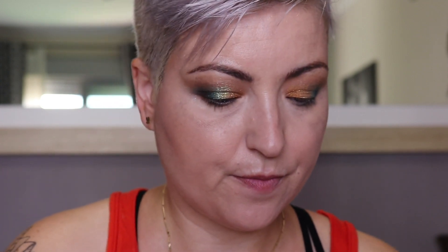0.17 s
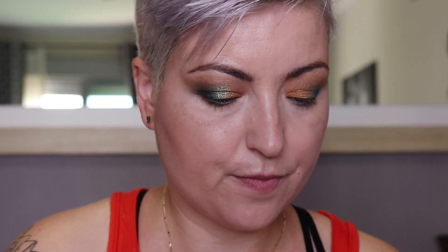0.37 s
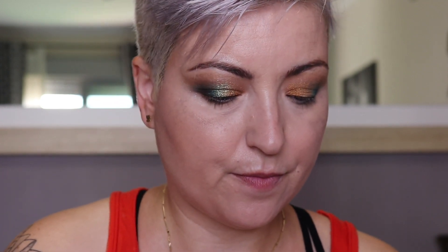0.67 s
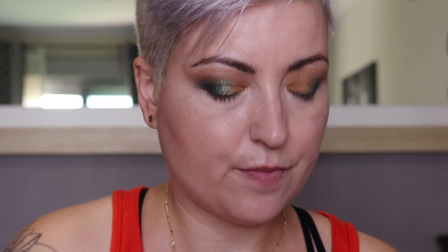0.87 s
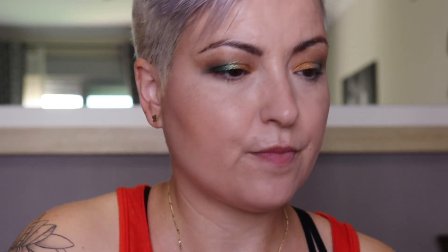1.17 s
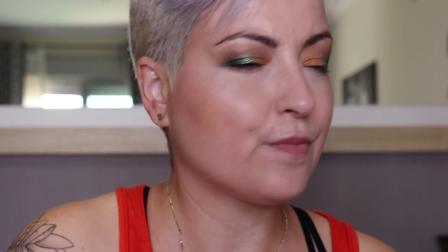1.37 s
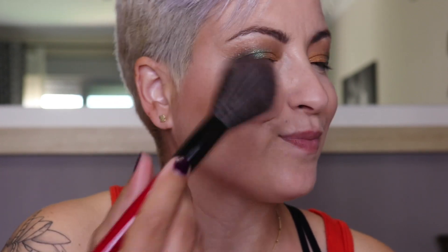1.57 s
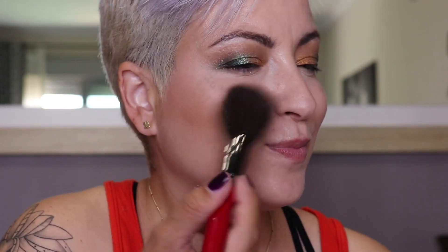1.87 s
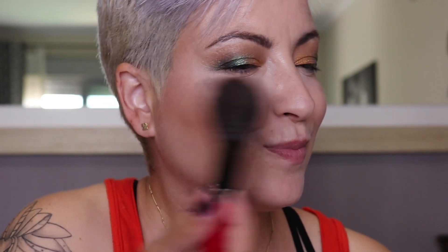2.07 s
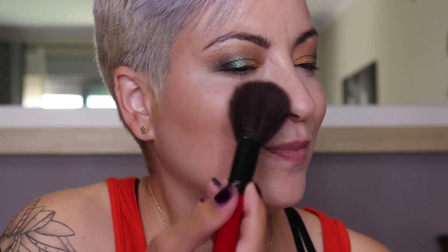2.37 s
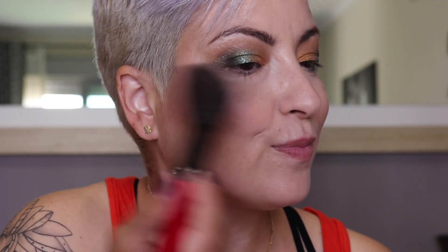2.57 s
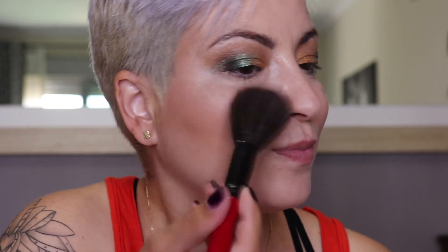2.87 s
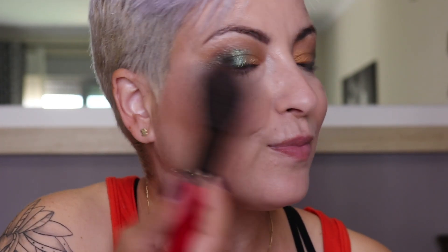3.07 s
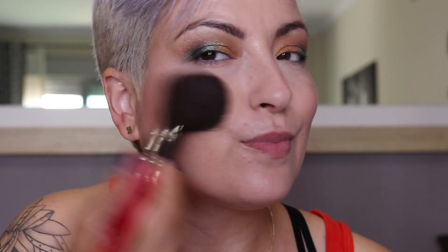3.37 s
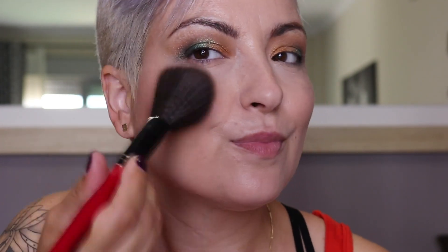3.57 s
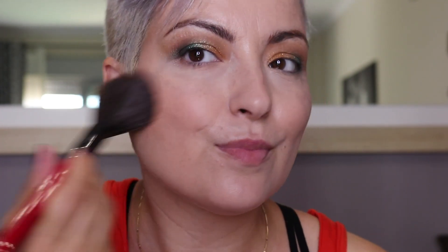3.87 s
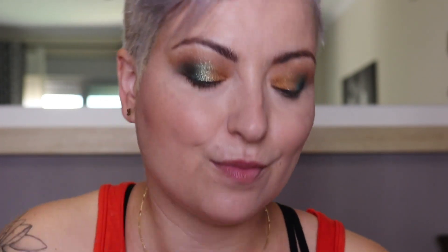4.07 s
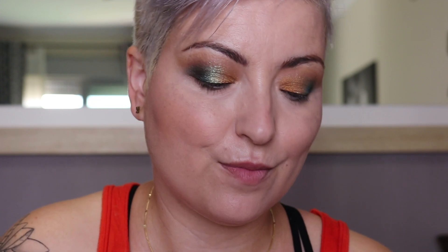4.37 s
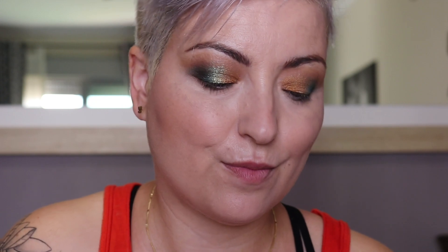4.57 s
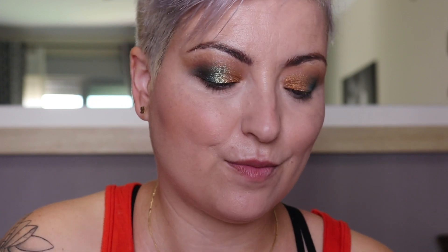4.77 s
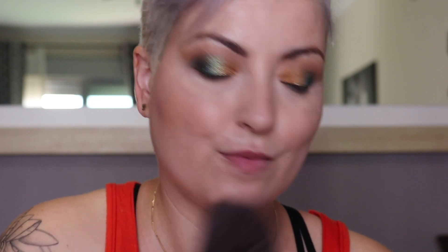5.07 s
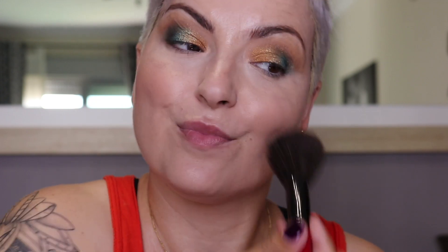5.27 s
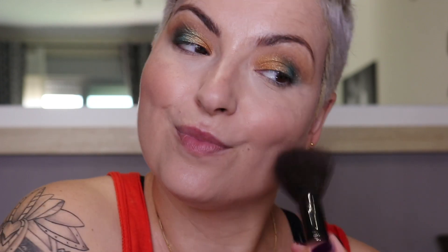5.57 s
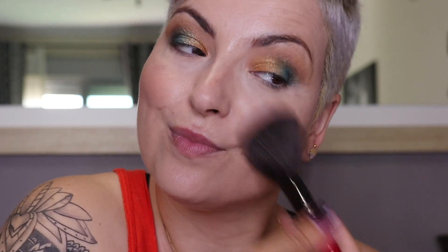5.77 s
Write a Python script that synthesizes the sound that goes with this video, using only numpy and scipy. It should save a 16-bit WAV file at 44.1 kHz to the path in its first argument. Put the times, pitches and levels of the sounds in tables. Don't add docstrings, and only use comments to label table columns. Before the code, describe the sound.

Two loud sharp taps break a hushed room where a makeup brush whispers in short airy strokes, with distant birds and low engine hum.

```python
import sys
import numpy as np
from scipy import signal
from scipy.fft import rfft, irfft, next_fast_len
from scipy.io import wavfile
from scipy.ndimage import uniform_filter1d, map_coordinates

SR = 44100
rng = np.random.default_rng(int(sys.argv[2]) if len(sys.argv) > 2 else 0)


def store_pcm(level_fs):
    pcm = np.round(np.clip(level_fs, -1, 1) * 32767).astype(np.int16)
    wavfile.write(sys.argv[1], SR, np.atleast_2d(pcm).T)


def amplitude_ratio(level_db):
    exponent = np.asarray(level_db, float) / 20
    return 10 ** exponent


N = 260631

# [f/Hz, density/dB per Hz]
AIR_COLOUR = [(12, -25), (20, -21), (49, -4.5), (95, -9.5), (208, -8), (260, -7.5), (374, -14), (537, -8.5),
              (635, -11), (1510, -18), (1940, -22), (5290, -24), (6800, -27.5), (11900, -29.5),
              (15700, -29.5)]
# [t/s, turning rate of one cycle/Hz, load/dB]
ENGINE_IDLE = [(0, 24.93, -47), (.35, 26.34, -48.5), (1.0, 26.45, -50), (1.6, 26.04, -51),
               (2.2, 26.16, -57.5), (3.1, 26.52, -63), (3.6, 26.14, -52), (4.7, 25.53, -55.5),
               (5.1, 25.87, -47), (5.45, 24.2, -54), (5.62, 24.17, -45), (5.91, 24.06, -73)]
# [t/s, strength/dB, thud/dB, brightness/dB per octave]
HANDLE_TAPS = [
    (1.161, 4.46, -15.5, 2.9),
    (1.3807, 5.5, -37, 4.5),
]


def unit(x):
    return x / np.sqrt(np.mean(x ** 2) + 1e-20)


def along(points, hz):
    f, v = np.transpose(points)
    return np.interp(np.log(hz + 1), np.log(f + 1), v)


def curves(rows):
    s, *cols = np.transpose(rows)
    return [np.interp(np.arange(N) / SR, s, c) for c in cols]


def wobble(rate):
    s = np.arange(0, N + 32, 32) / SR
    knots = rng.standard_normal(int(N * rate / SR) + 4)
    return np.interp(np.arange(N) / SR, s, map_coordinates(knots, [s * rate]))


def filtered(x, response):
    m = next_fast_len(len(x) + 8192)
    return irfft(rfft(x, m) * response(np.fft.rfftfreq(m, 1 / SR)), m)[:len(x)]


def rush(spectrum, patchy_db):
    z = signal.stft(rng.standard_normal(N), nperseg=512)[2]
    field = uniform_filter1d(rng.standard_normal(z.shape), size=5, axis=0)
    field = uniform_filter1d(field, size=12, axis=1)
    x = signal.istft(z * amplitude_ratio(patchy_db * unit(field)), nperseg=512)[1][:N]
    return unit(filtered(x, lambda hz: amplitude_ratio(along(spectrum, hz))))


def tail(decays):
    hz, t, z = signal.stft(rng.standard_normal(SR // 2), SR, nperseg=128)
    fading = z * amplitude_ratio(-60 * t / along(decays, hz)[:, None])
    h = signal.istft(fading, SR, nperseg=128)[1]
    return h / np.linalg.norm(h)


def add(track, x, s):
    part = track[round(s * SR):][:len(x)]
    part += x[:len(part)]


def room_tone():
    murmur_per_load = 0.04
    air = amplitude_ratio(-48.5) * rush(AIR_COLOUR, patchy_db=0.96)
    load_db = curves(ENGINE_IDLE)[1]
    low = filtered(air, lambda hz: 1 / (1 + (hz / 2500) ** 2))
    swell_db = murmur_per_load * (load_db - np.mean(load_db)) - 0.65
    return air + low * (amplitude_ratio(swell_db) - 1)


def engine():
    # [order, level/dB]
    loaded_orders = [(2, -1), (4, -10.5), (3, -11.5)]
    # [order, level/dB]
    weak_orders = [(5, -63), (6, -61), (7, -63), (9, -64.5), (10, -69), (11, -65)]
    # [middle t/s, width/s, order, level/dB]
    booming_orders = [(.15, .15, 4, -61), (.6, 0.61, 6, -54), (.9, 0.15, 10, -54), (1.0, .3, 5, -50),
                      (1.7, 0.39, 4, -50.5), (1.7, .35, 3, -56), (1.78, 0.13, 10, -53),
                      (2.6, 0.39, 10, -55), (2.85, 0.71, 6, -52), (3.55, 0.6, 10, -53), (4.7, 0.75, 4, -55),
                      (5.45, 0.11, 10, -53.5)]
    # [t/s, level/dB]
    drone_levels = [(0, -54.5), (.9, -70), (1.6, -51), (2.4, -56), (3.4, -60.5), (4.2, -55), (5.15, -45.5),
                    (5.91, -54)]
    t = np.arange(N) / SR
    cycle_hz, load_db = curves(ENGINE_IDLE)
    cycle_phase = 2 * np.pi * np.cumsum(cycle_hz) / SR
    orders = [(k, amplitude_ratio(load_db + db + 1.7 * wobble(7))) for k, db in loaded_orders]
    orders += [(k, amplitude_ratio(db + 3.15 * wobble(2.65))) for k, db in weak_orders]
    for s, width, k, db in booming_orders:
        orders.append((k, amplitude_ratio(db) * np.exp(-2 * ((t - s) / width) ** 2)))
    out = np.zeros(N)
    for k, gain in orders:
        phase = round(k) * cycle_phase + 0.89 * wobble(4) + 6 * rng.random()
        out += amplitude_ratio(1.5) * gain * np.sin(phase)
    drone_hz = 31.2 + 1.22 * wobble(2.396)
    drone_db = curves(drone_levels)[0] + 2.5 + 4.4 * wobble(10.0)
    return out + amplitude_ratio(drone_db) * np.sin(2 * np.pi * np.cumsum(drone_hz) / SR)


def sung(points, s, stretch, top_hz, db):
    floor_hz = 3100
    at, share, level_db = np.transpose(points)
    at = at * stretch
    t = np.arange(at[0], at[-1], 1 / SR)
    hz = floor_hz + np.interp(t, at, share) * (top_hz - floor_hz)
    hz = uniform_filter1d(hz, size=60, mode="nearest")
    gain = amplitude_ratio(np.interp(t, at, level_db)) * signal.windows.tukey(len(t), .12)
    return s + t[0], hz, gain, db


def songs():
    # [t before the arch/s, pitch as share of the way up/0-1, level/dB]
    chirp_sweep = [
        (-.122, .09, -24),
        (-.1, .2, -15),
        (-.078, .33, -7),
        (-.073, .7, -14),
        (-.069, .98, -8),
        (-.044, 1.0, -12),
        (-.037, .5, -12),
        (-.031, .22, -3),
        (-.012, 0, -20),
    ]
    sweep_top = (4, 6)
    # [t/s, pitch as share of the way up/0-1, level/dB]
    chirp_arch = [
        (0, .14, -6),
        (.006, .31, 1.5),
        (.016, .58, 2),
        (.022, 1.0, -5),
        (.03, .6, -2),
        (.037, .3, 2),
        (.052, -.05, -22),
    ]
    # [arch start t/s, level/dB, stretch/times, top f/Hz, crest f/Hz]
    full_chirps = [(.461, -35, 1.04, 5150, 4600), (2.007, -37, 1.0, 5400, 4200),
                   (2.444, -35, .99, 5400, 4550), (4.894, -37, .88, 5050, 4050)]
    # [arch start t/s, level/dB, stretch/times, first half/dB, crest f/Hz]
    short_chirps = [(.124, -49, 0.99, 3, 4000), (1.553, -56, .75, 19.5, 3800), (2.937, -48, 0.7, 6, 3700),
                    (4.065, -53, .9, -6, 4110), (4.23, -47.5, .9, 4, 4060), (5.552, -49.5, 0.7, 6, 3900)]
    # [start t/s, length/s, first f/Hz, last f/Hz, level/dB]
    bird_glides = [(0.36, .022, 5900, 5700, -54), (1.698, 0.16, 5600, 5800, -66),
                   (2.046, 0.087, 5860, 5530, -54.5), (2.217, 0.1, 6000, 6300, -63),
                   (2.952, 0.21, 6050, 6000, -64.5), (3.142, .055, 4690, 3620, -49),
                   (3.18, 0.043, 4430, 3520, -49.5), (3.217, .055, 3940, 2930, -51.5),
                   (3.325, 0.057, 5380, 5860, -56.5), (3.411, 0.028, 4270, 4490, -58.5),
                   (3.834, 0.031, 5010, 4940, -53.5), (3.891, 0.074, 3560, 4750, -55),
                   (5.343, .05, 4980, 5300, -69), (5.393, 0.035, 3670, 3270, -54),
                   (5.642, 0.023, 5320, 5520, -59), (5.82, 0.063, 4700, 4880, -59),
                   (5.876, 0.028, 4864, 4480, -46)]
    short_top_hz, short_hold_s = 5400, .006
    notes = []
    for s, db, stretch, top_hz, crest_hz in full_chirps:
        notes.append(sung(chirp_sweep, s, stretch, top_hz, db))
        notes.append(sung(chirp_arch, s, stretch, crest_hz, db))
        notes.append(sung(chirp_sweep[slice(*sweep_top)], s, stretch, top_hz + 620, db - 11))
    top_s, *top_rest = chirp_sweep[4]
    held = [(top_s - short_hold_s, *top_rest)] + list(chirp_sweep[5:])
    for s, db, stretch, first_db, crest_hz in short_chirps:
        start, hz, gain, _ = sung(held, s, stretch, short_top_hz, db)
        thin = amplitude_ratio(-12 * (hz < .9 * short_top_hz))
        notes.append((start, hz, amplitude_ratio(first_db) * gain * thin, db))
        notes.append(sung(chirp_arch, s, stretch, crest_hz, db))
    for s, length, first_hz, last_hz, db in bird_glides:
        u = np.linspace(0, 1, round(length * SR))
        hz = first_hz + (last_hz - first_hz) * u
        gain = amplitude_ratio(2.4 * u) * np.abs(np.sin(np.pi * u)) ** 0.23
        notes.append((s, hz, gain, db))
    return notes


def sparrows():
    # [f/Hz, time to fall 60 dB/s]
    yard_decay = [(2500, 0.26), (4000, 0.92), (7000, 0.27)]
    # [f/Hz, level/dB]
    window_path = [(2500, -8), (3100, -2), (3600, 1), (3950, 0), (4400, -10), (4900, -6), (5300, -1),
                   (12000, -4)]
    # [f/Hz, level/dB]
    wall_path = [(2500, -10), (3200, -8), (3600, -10), (4200, -4), (4700, 1), (5400, 1), (6200, 1)]
    # [f/Hz, density/dB per Hz]
    flock_colour = [(2500, -18), (3100, -8), (3700, -7.5), (4500, -8), (5500, -8.5), (6200, -13),
                    (7000, -36)]
    # [t/s, level/dB]
    flock_levels = [(0, -58.5), (1.5, -60), (3, -56), (4.2, -61.5), (5.91, -57.5)]
    direct, wall, perches = np.zeros(N), np.zeros(N), np.zeros((4, N))
    unsteady = wobble(350)
    for k, (s, hz, gain, db) in enumerate(songs()):
        far = np.clip((-47 - db) / 10, 0, 1)
        hz = hz * (1 + (.006 + .012 * far) * np.resize(unsteady[round(s * SR):], len(hz)))
        phase = 2 * np.pi * np.cumsum(hz) / SR
        flutter_turns = 130 * np.arange(len(hz)) / SR + rng.random()
        flutter = 1 + 0.41 * np.sin(2 * np.pi * flutter_turns)
        voice = np.sin(phase) + amplitude_ratio(-35) * np.sin(2 * phase)
        note = amplitude_ratio(db + 5.5) * gain * flutter * voice
        add(direct, amplitude_ratio(-10 * far) * note, s)
        add(wall, amplitude_ratio(-7) * note, s + .103)
        add(wall, amplitude_ratio(-15) * note, s + .206)
        add(perches[k % len(perches)], amplitude_ratio(1.7 * far) * note, s + .008)
    perches = perches * (1 + .9 * wobble(300))
    t = np.arange(SR // 30) / SR
    frame = amplitude_ratio(-31 - 60 * t / .035) * rng.standard_normal(len(t))
    direct = amplitude_ratio(-2.9) * (direct + signal.fftconvolve(direct, frame)[:N])
    yard = sum(signal.fftconvolve(perch, tail(yard_decay))[:N] for perch in perches)
    wall = wall + amplitude_ratio(4.5) * signal.fftconvolve(wall, frame)[:N] + amplitude_ratio(-6) * yard
    near = filtered(direct, lambda hz: amplitude_ratio(along(window_path, hz)))
    near += filtered(wall, lambda hz: amplitude_ratio(along(wall_path, hz)))
    return near + amplitude_ratio(curves(flock_levels)[0]) * rush(flock_colour, patchy_db=4.5)


def brush():
    # [middle t/s, level/dB, width/s, brightest f/Hz]
    brush_strokes = [(0.151, -65, 0.24, 10200), (0.401, -54.5, 0.067, 10700), (0.589, -56.5, 0.044, 11100),
                     (0.799, -54.5, 0.052, 11800), (1.972, -54, 0.073, 10970), (2.264, -56, 0.092, 11350),
                     (2.389, -60, 0.086, 11000), (2.515, -57, 0.058, 11700), (2.765, -57, 0.057, 11930),
                     (3.008, -56.5, 0.06, 11470), (3.239, -57, 0.074, 11400), (3.474, -57.5, 0.047, 11700),
                     (3.696, -61, 0.038, 11420), (3.94, -58, 0.078, 11400), (4.416, -57, 0.056, 10800),
                     (4.638, -54, 0.021, 10760), (4.843, -55.5, 0.06, 9670), (5.237, -56, 0.088, 8800),
                     (5.461, -60, 0.04, 9160), (5.584, -53.5, 0.087, 10000), (5.73, -59.5, 0.033, 9080),
                     (5.847, -53.5, 0.088, 10200)]
    # [f/Hz, density/dB per Hz]
    rub_colour = [(1500, -20), (4000, 0), (7000, -7), (12000, -6), (16000, -18)]
    out = np.zeros(N)
    t = np.arange(-SR // 4, SR // 4) / SR
    for s, db, width, peak_hz in brush_strokes:
        slips = rng.standard_normal(len(t)) * amplitude_ratio(7.4 * rng.standard_normal(len(t)))

        def colour(hz):
            resonance = np.exp(-(np.log((hz + 1) / peak_hz) / 0.13) ** 2)
            return amplitude_ratio(along(rub_colour, hz)) + 0.43 * resonance

        swell = np.exp(-1.4 * (t / (width / 2)) ** 2 / 2)
        stroke = amplitude_ratio(db) * swell * unit(filtered(slips, colour))
        start = max(0, s - .25)
        add(out, stroke[round((start - s + .25) * SR):], start)
    return out


def taps():
    # [f/Hz, level/dB, time to fall 60 dB/s]
    case_modes = [(484, -19.5, .03), (610, -22, 0.027), (780, -9, 0.02), (1720, -.5, 0.0093),
                  (2550, -5, 0.0048), (3300, -5.5, 0.0038), (4100, -1, 0.004), (5250, -8, 0.004),
                  (6850, -8.5, 0.0045), (8400, -.5, 0.004), (10200, -8, 0.0027), (12250, -6.5, 0.0036),
                  (13250, -8, 0.0035), (14200, -15, .003)]
    # [delay/s, level/dB]
    near_echoes = [(.0041, -7), (.0064, -20), (.0085, -16), (.0115, -20)]
    # [f/Hz, time to fall 60 dB/s]
    room_decay = [(300, 0.34), (1600, 0.43), (4000, 0.49), (8400, 0.36), (15000, 0.33)]
    # [f/Hz, density/dB per Hz]
    room_colour = [(300, -9), (490, -6), (600, -6), (740, 2), (1000, -29), (2200, -8.5), (3300, -12.5),
                   (4600, -5.5), (6300, -14.5), (8300, -4.5), (10500, -10.5), (12800, -7.5), (15700, -18)]
    # [f/Hz, width/Hz, level/dB]
    case_rings = [(1600, 340, 1), (4040, 560, -6), (8270, 600, -2.5)]
    out, t = np.zeros(N), np.arange(SR // 20) / SR
    lean = signal.butter(6, 450, "highpass", fs=SR, output="sos")

    def wash_colour(hz):
        rings = sum(amplitude_ratio(g) / (1 + (2 * (hz - c) / w) ** 2) for c, w, g in case_rings)
        return amplitude_ratio(along(room_colour, hz)) + rings

    for s, db, thud_db, tilt_db in HANDLE_TAPS:
        modes = np.zeros(len(t))
        for hz, mode_db, t60 in case_modes:
            bright_db = tilt_db * np.log2(hz / 3000)
            modes += amplitude_ratio(mode_db + bright_db - 60 * t / t60) * np.sin(2 * np.pi * hz * t)
        chatter = .09 * amplitude_ratio(-60 * t / .004) * rng.standard_normal(len(t))
        chatter[0] = 1
        thud = amplitude_ratio(thud_db - 60 * t / 0.014) * np.sin(2 * np.pi * 130 * t)
        ringing = signal.sosfilt(lean, signal.fftconvolve(chatter, modes)[:len(t)])
        blow = amplitude_ratio(db) * (ringing + thud)
        add(out, blow, s)
        for delay, echo_db in near_echoes:
            add(out, -amplitude_ratio(echo_db) * blow, s + delay)
        clutter = amplitude_ratio(-28 - 60 * t / .035) * rng.standard_normal(len(t))
        add(out, signal.fftconvolve(blow, clutter), s + .0025)
        wash = filtered(tail(room_decay), wash_colour)
        add(out, amplitude_ratio(db + 6.5) * wash / np.linalg.norm(wash), s + 0.0056)
        boom = filtered(tail([(60, 1.0), (600, 0.55)]), lambda hz: amplitude_ratio(along(AIR_COLOUR, hz)))
        add(out, amplitude_ratio(db - 3.5) * boom / np.linalg.norm(boom), s + 0.011)
    return out


def ticks():
    # [t/s, f/Hz, level/dB, time to fall 60 dB/s]
    hand_knocks = [
        (5.193, 3600, -42, .006),
        (5.196, 218.8, -44, .02),
        (5.274, 990, -39, 0.022),
        (5.302, 328, -42, .02),
    ]
    out, t = np.zeros(N), np.arange(SR // 20) / SR
    for s, hz, db, t60 in hand_knocks:
        add(out, amplitude_ratio(db - 60 * t / t60) * np.sin(2 * np.pi * hz * t), s)
    return out


def scene():
    mono = room_tone() + engine() + sparrows() + brush() + taps() + ticks()
    return np.tile(mono, (2, 1))


def low_pass(x):
    return signal.sosfilt(signal.butter(12, 15840, fs=SR, output="sos"), x)


def record(dry):
    t, duck_db = np.arange(N) / SR, np.zeros(N)
    for s, *_ in HANDLE_TAPS:
        age = np.maximum(t - s, 0)
        dive = 1 - np.exp(-age / 0.003)
        recovery = np.exp(-(age / 0.094) ** 1.05)
        duck_db -= 16 * dive * recovery
    x = dry * amplitude_ratio(duck_db)
    x = x / (1 + np.abs(x) ** 8) ** (1 / 8)
    x = signal.sosfilt(signal.butter(6, 15700, fs=SR, output="sos"), x)
    hiss_colour = [(50, -10.0), (300, 0.0), (1500, -4.5), (6000, -3.5), (16000, -1.5)]  # f/Hz, dB per Hz
    hiss = amplitude_ratio(-62.5) * rush(hiss_colour, patchy_db=-2.5)
    return low_pass(x + [hiss, -hiss])


dry = scene()
out = record(dry)
store_pcm(out)
```